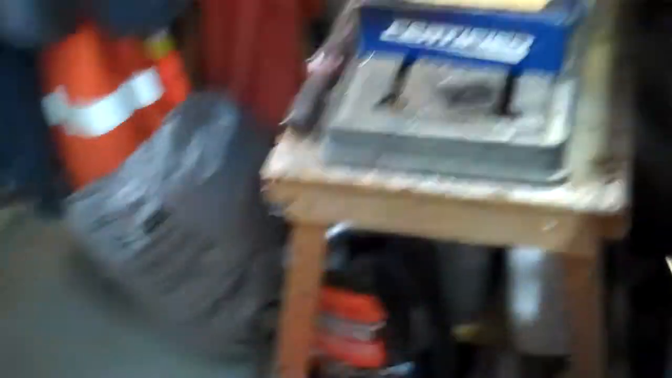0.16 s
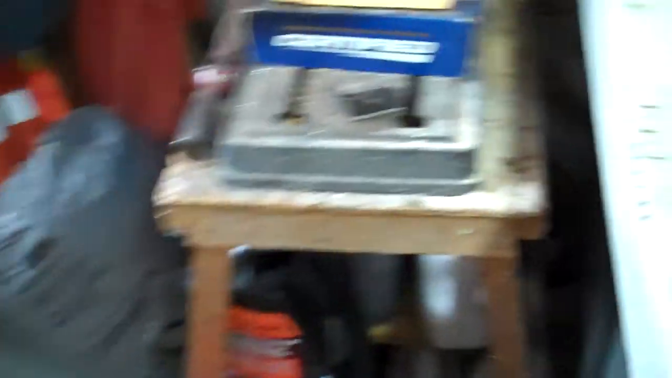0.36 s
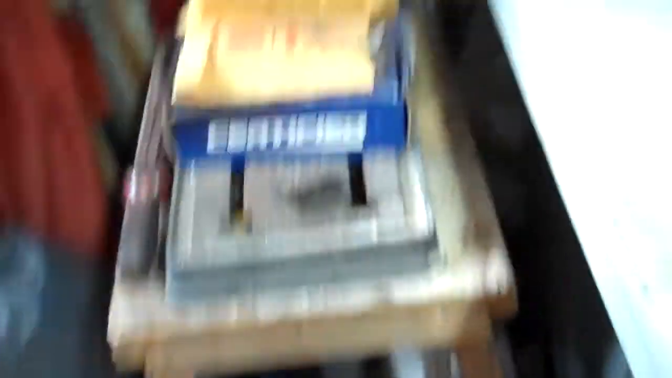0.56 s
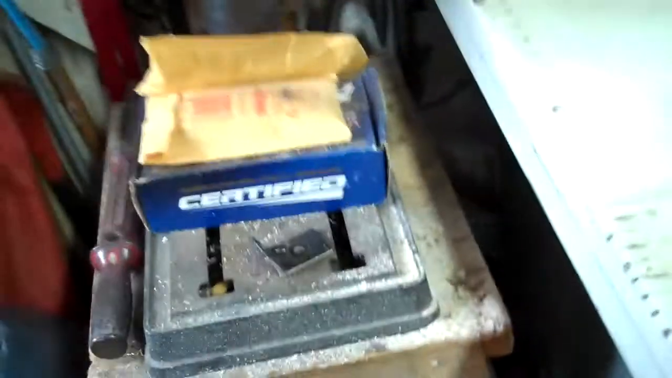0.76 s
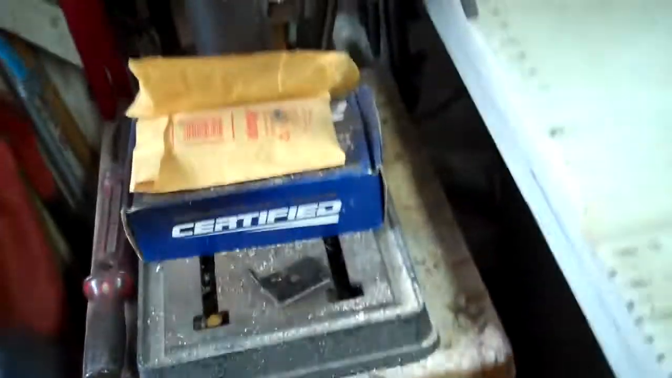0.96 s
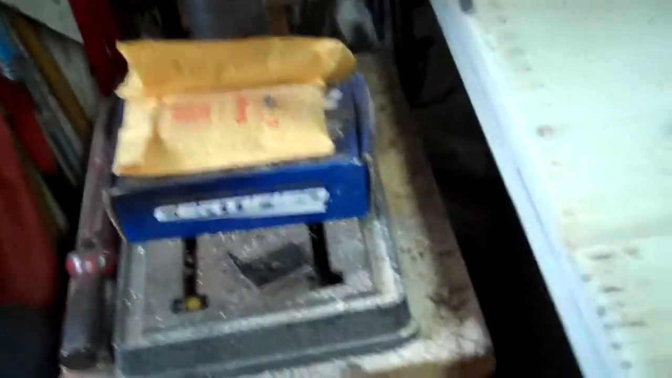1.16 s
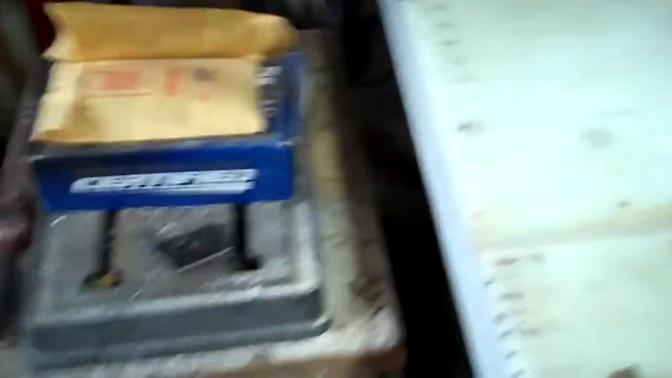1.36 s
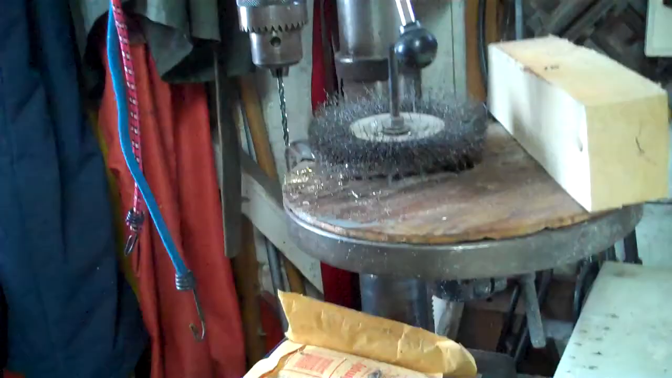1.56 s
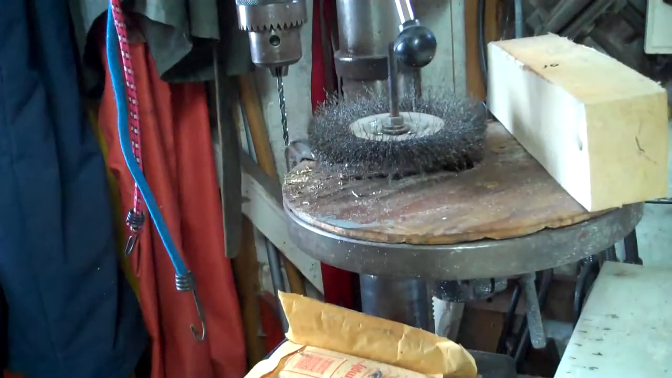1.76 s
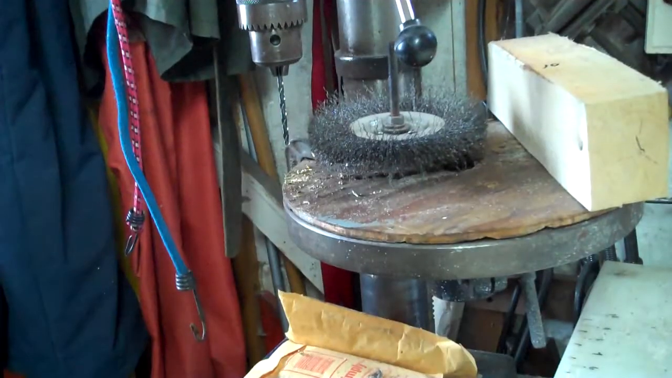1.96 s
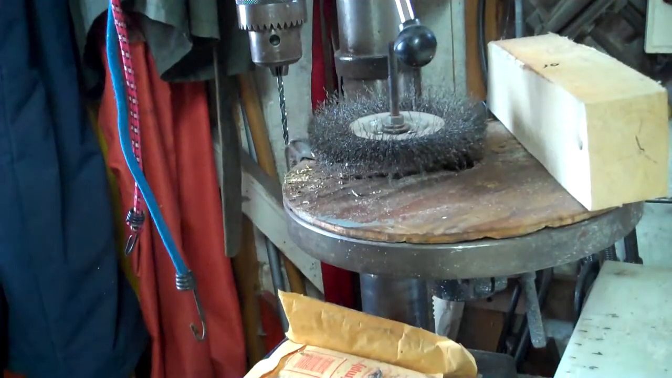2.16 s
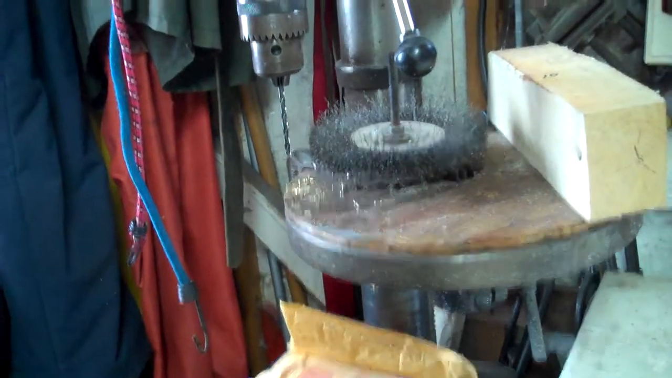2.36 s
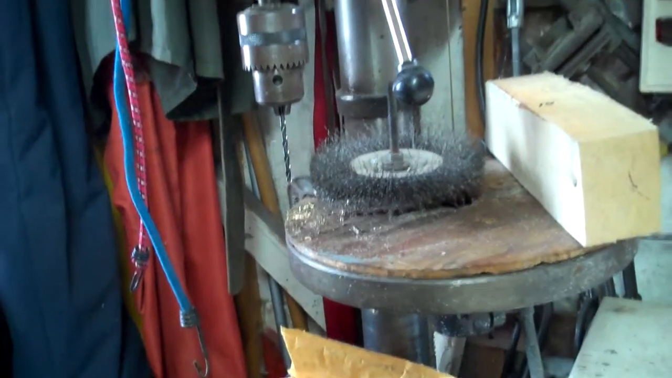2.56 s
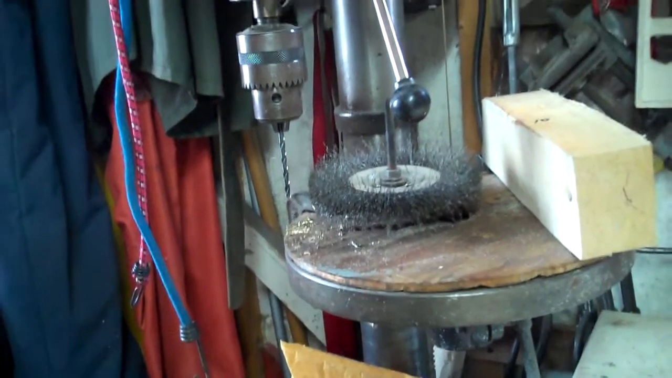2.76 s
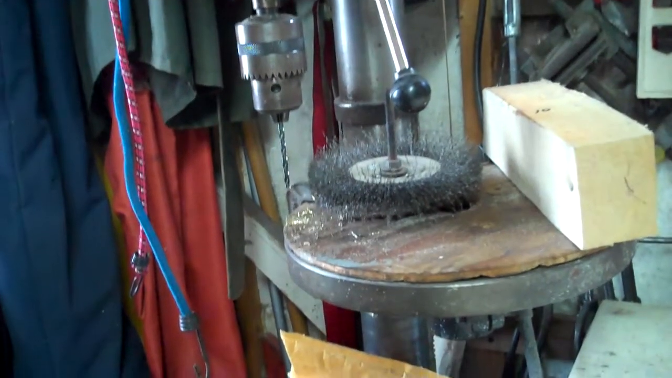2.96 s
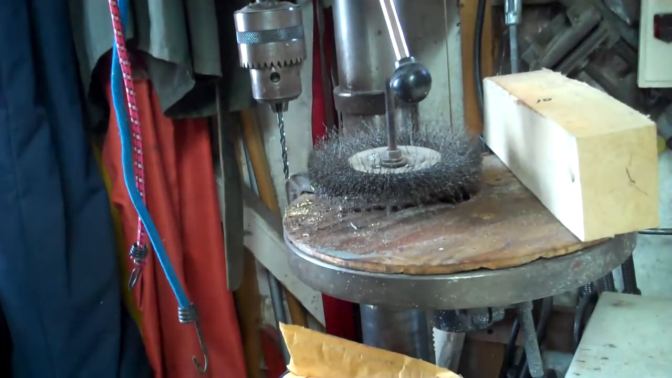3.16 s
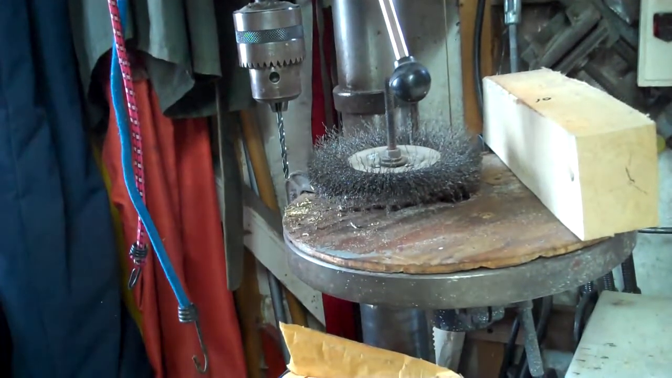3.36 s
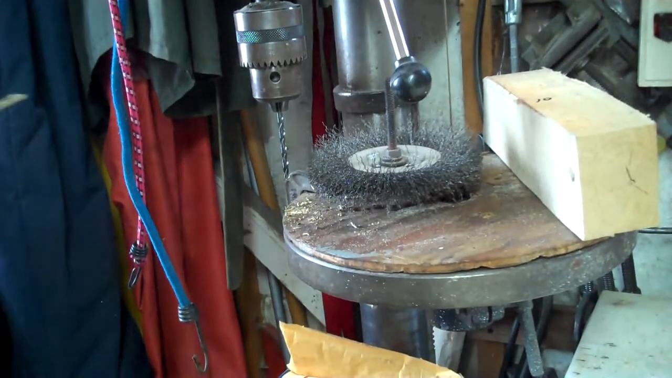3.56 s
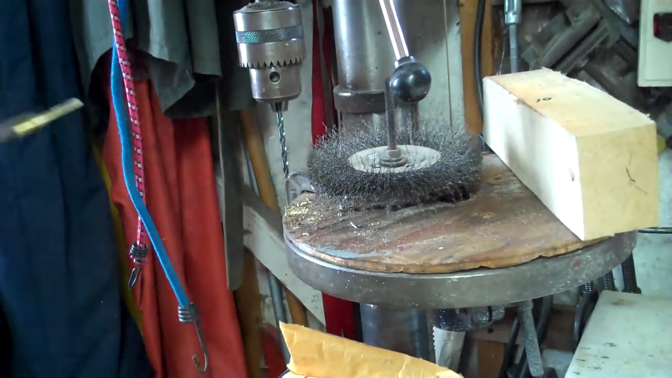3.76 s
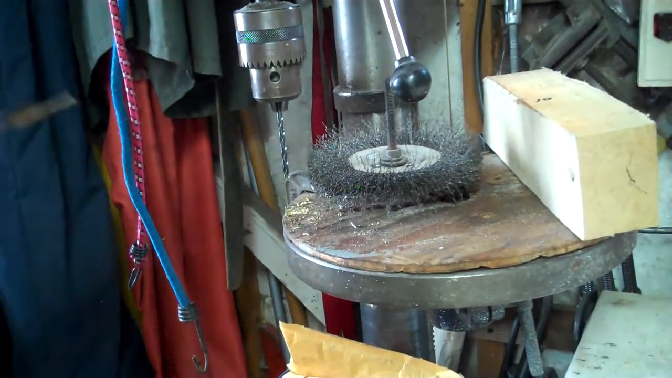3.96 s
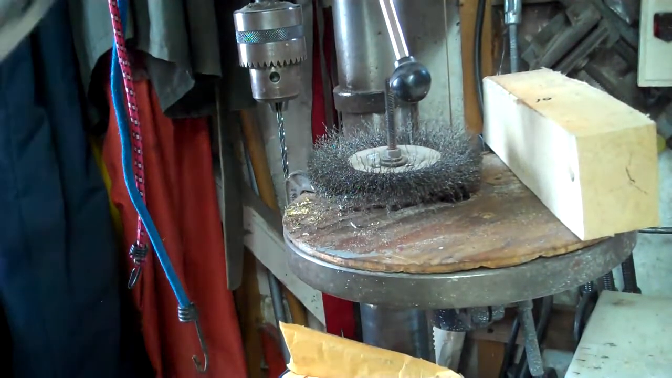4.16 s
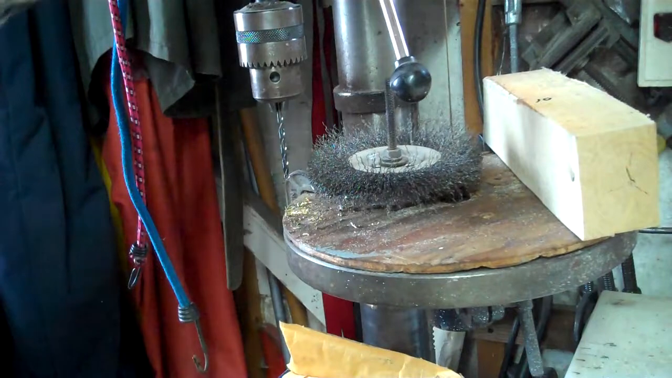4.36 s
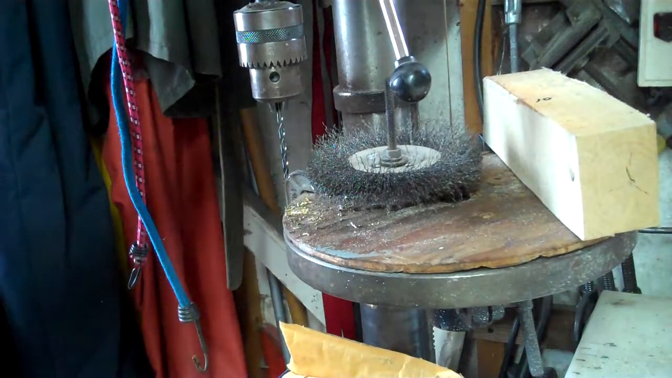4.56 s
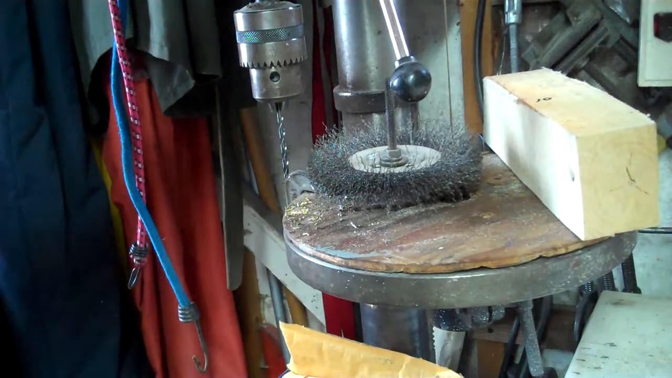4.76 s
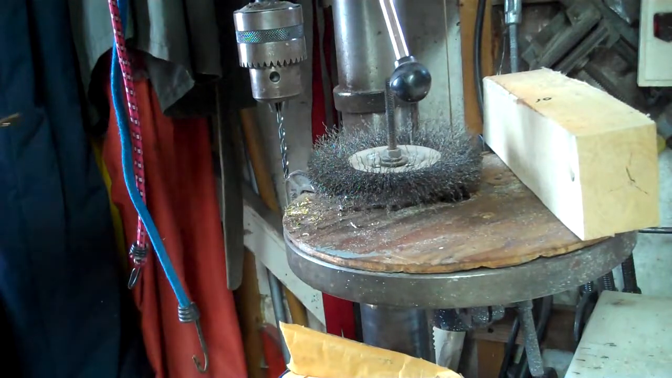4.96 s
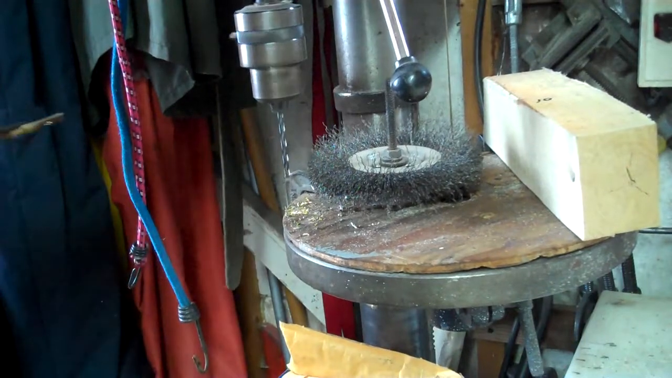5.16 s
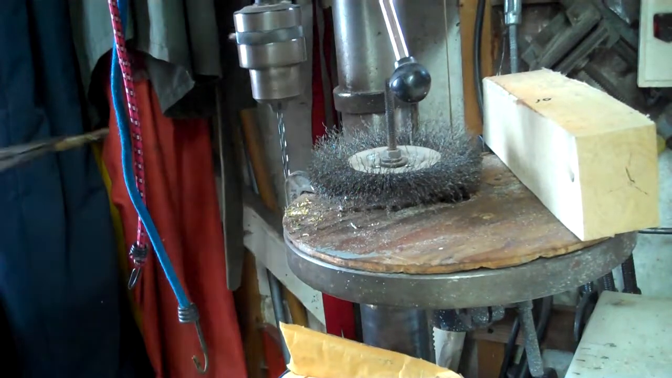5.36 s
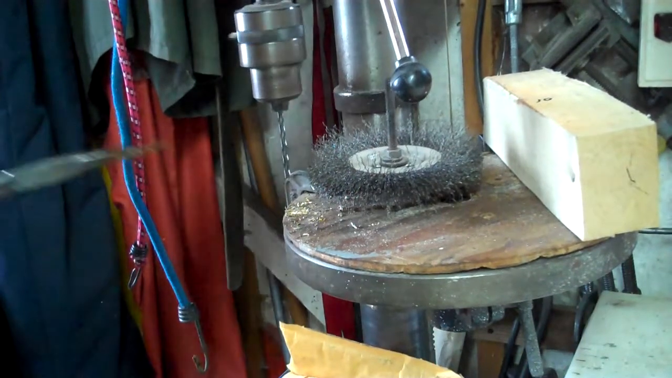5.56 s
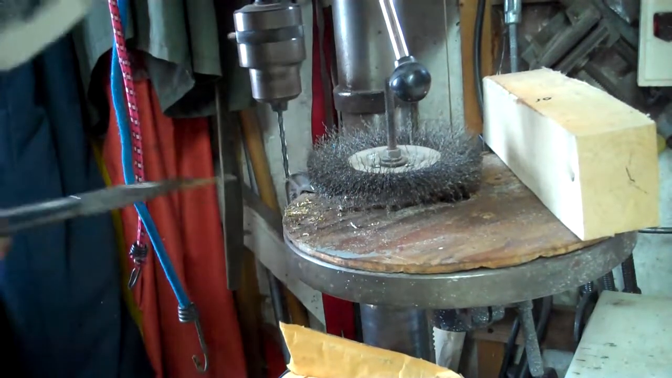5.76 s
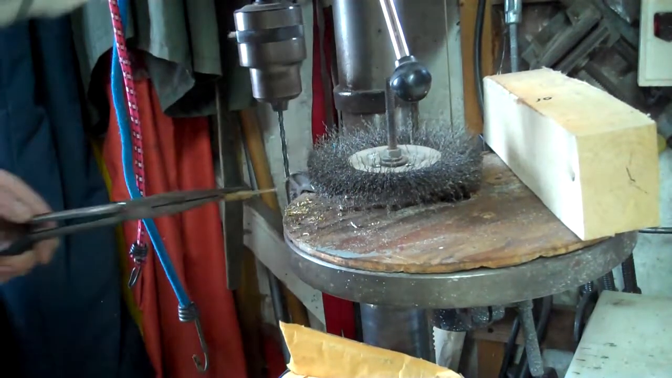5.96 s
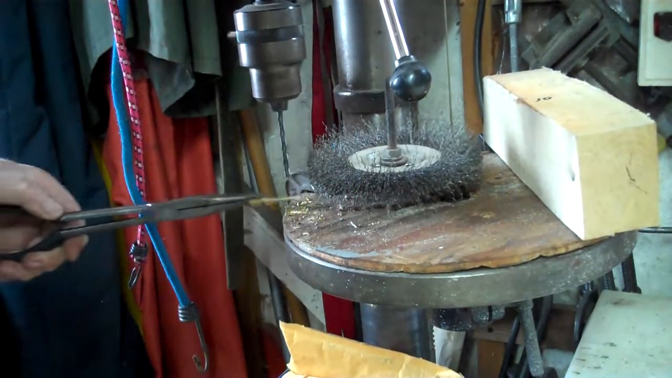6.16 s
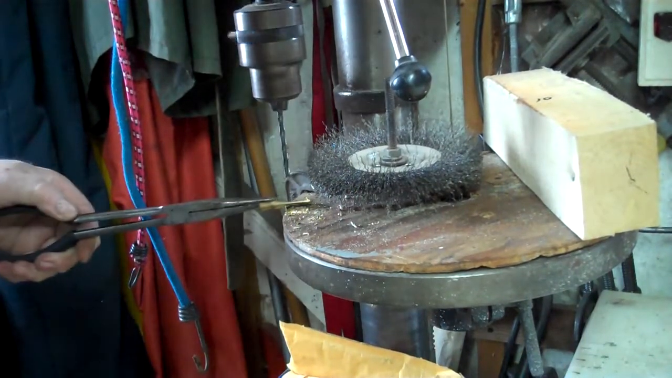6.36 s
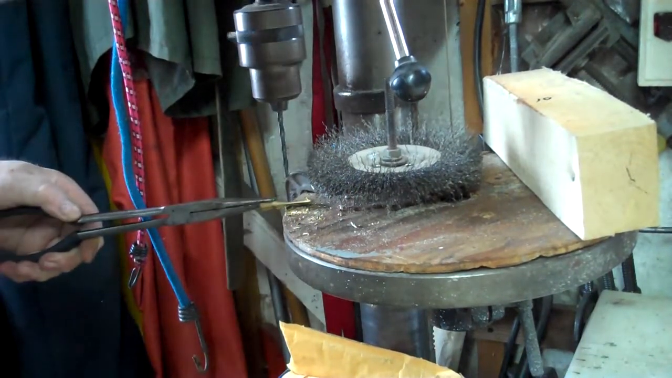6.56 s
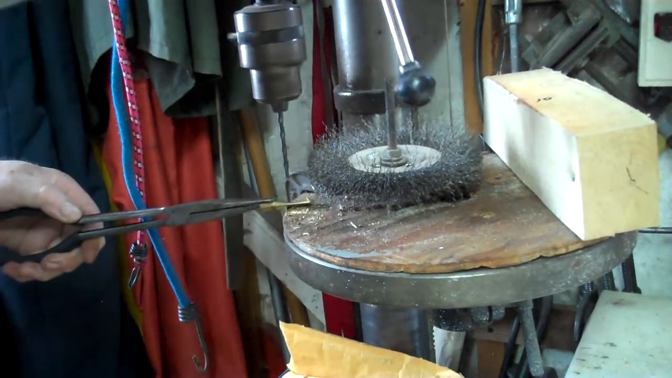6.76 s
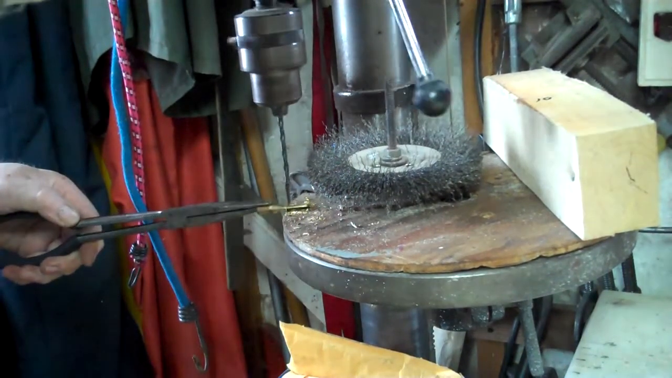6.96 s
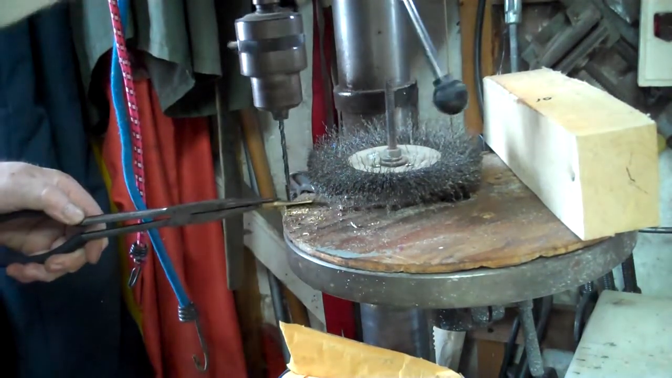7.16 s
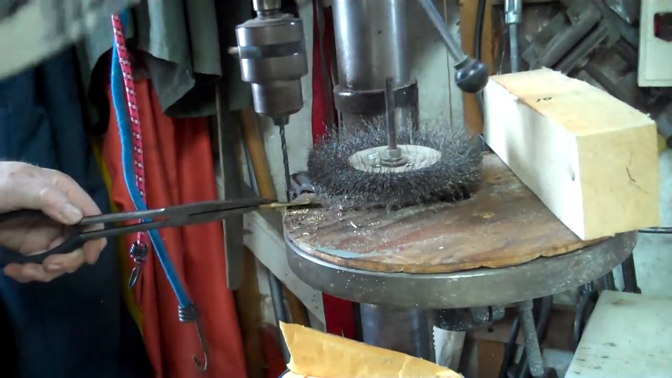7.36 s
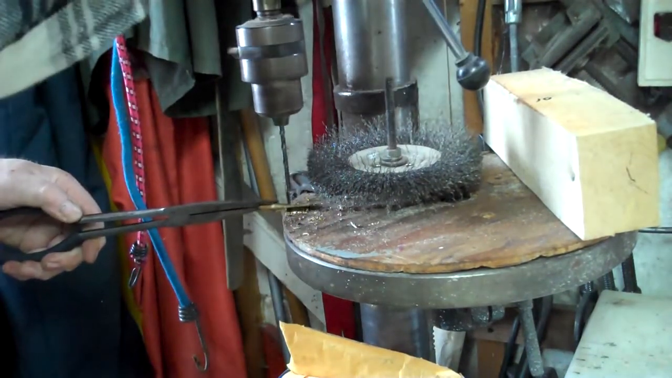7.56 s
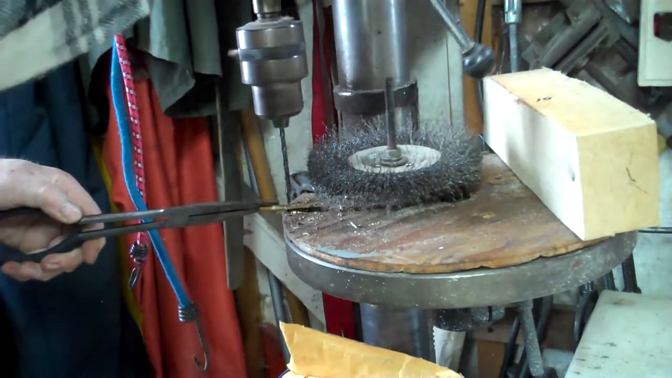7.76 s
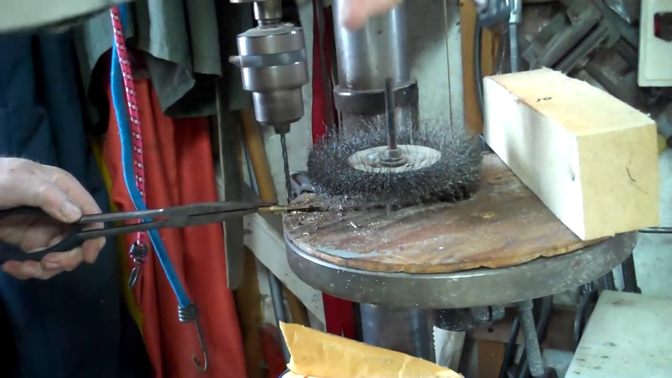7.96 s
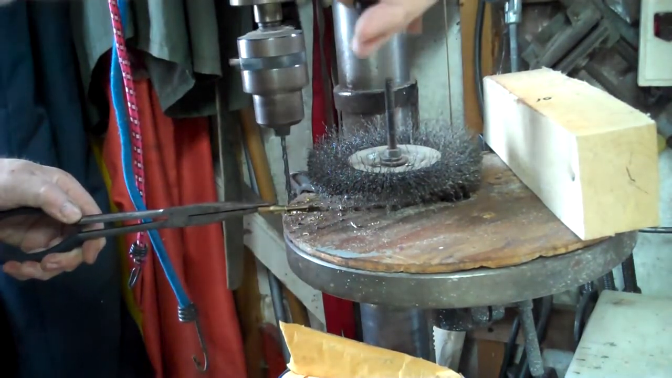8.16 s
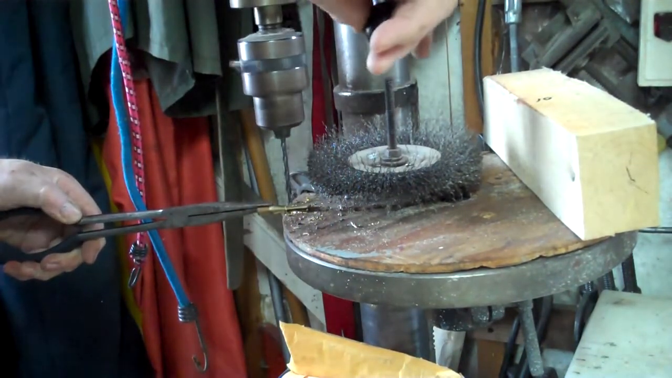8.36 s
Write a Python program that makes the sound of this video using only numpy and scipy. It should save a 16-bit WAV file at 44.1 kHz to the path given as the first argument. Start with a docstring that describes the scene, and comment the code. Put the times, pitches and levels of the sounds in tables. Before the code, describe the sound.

Metal parts knock and slide on a bench, a brief dropout pops, then a bench drill starts, ticking steadily before its bit rasps and squeals.

```python
"""In a small workshop, metal pieces are handled with clicks, knocks and scuffs: decaying modes and noise.
A switch snaps and a bench drill press runs: mains harmonics hum, noise bands whir and hiss.
It rubs once a turn, about five times a second; fed into a brass case held in pliers, the bit rasps:
short swells of resonant noise, joined by a squeal that grows as the cut goes on.
Diffuse echoes and still air surround it; early on the sound drops out briefly and returns with a pop."""
import sys
import numpy as np
from scipy import signal
from scipy.fft import rfft, irfft, next_fast_len
from scipy.io import wavfile

SR = 44100
rng = np.random.default_rng(int(sys.argv[2]) if len(sys.argv) > 2 else 0)


def file_out(sig):
    """Save sig as 16-bit WAV at sys.argv[1]."""
    # one column per channel
    cols = np.atleast_2d(sig).T
    # limit, then scale
    lim = np.clip(cols, -1, 1)
    pcm = np.round(lim * 32767).astype(np.int16)
    wavfile.write(sys.argv[1], SR, pcm)


N = 370881
T = np.arange(N) / SR
SIZE = next_fast_len(N + SR, real=True)
BINS = np.maximum(np.arange(SIZE // 2 + 1) * SR / SIZE, 1)  # frequencies of the spectrum [Hz]
DROPOUT_S, POP_S, POP_END_S = 1.57, 1.598, 1.6115
FIRST_RUB_S, TURN_S = 5.272, 0.1985  # one rub is heard per turn


def from_db(db):
    """Level definition: decibels to amplitude gain."""
    return 10 ** (np.asarray(db) / 20)


def rms_one(x):
    """Normalization: the centre of the stereo image gets rms 1."""
    centre = np.atleast_2d(x).mean(axis=0)
    return x / np.sqrt(np.mean(centre ** 2) + 1e-20)


def at_hz(points, hz, axis=1):
    """Interpolation of one table column on a logarithmic frequency axis."""
    rows = np.array(points)
    return np.interp(np.log(hz), np.log(rows[:, 0]), rows[:, axis])


def gains(rows):
    """Level history: each dB column becomes a gain in time."""
    s, *columns = np.transpose(rows)
    return [from_db(np.interp(T, s, column)) for column in columns]


def drift(rate):
    """Random fluctuation of rms 1: chance values, `rate` per second, joined by straight lines."""
    points = rng.standard_normal(16384)
    return rms_one(np.interp(T * rate, np.arange(len(points)), points))


def band(low_hz, high_hz):
    """Band-pass filtering: gain per frequency with steep flanks."""
    return 1 / np.sqrt((1 + (low_hz / BINS) ** 10) * (1 + (BINS / high_hz) ** 10))


def colour(spectrum):
    """Spectral density: gain per frequency of a spectrum table."""
    return from_db(at_hz(spectrum, BINS))


def resonances(modes):
    """Resonance: steep-sided peaks in the gain, each carrying the power of its dB."""
    power = 0
    for hz, width_hz, db in modes:
        shape = 1 / (1 + ((BINS - hz) / width_hz) ** 2) ** 2
        power = power + from_db(db) ** 2 * shape / shape.mean()
    return np.sqrt(power)


def crowd_of_modes(uneven_db=2.5, spacing_hz=90):
    """Modal density: small metal parts have many modes, some strong and some weak."""
    heights = rng.standard_normal(2048)
    return from_db(uneven_db * np.interp(BINS / spacing_hz, np.arange(len(heights)), heights))


def strikes(rows, rise_s):
    """Exponential decay: blows (time [s], level [dB], T60 [s]) rise quickly and fall evenly in dB."""
    envelope, t = np.zeros(N + SR), T[:SR * 3 // 4]
    for s, db, t60 in rows:
        start = int(s * SR)
        decay = np.exp(-np.log(1000) * t / t60)
        envelope[start:start + len(t)] += from_db(db) * (1 - np.exp(-t / rise_s)) * decay
    return envelope[:N]


# The two microphone ports: (frequency [Hz], likeness [0-1], left minus right [dB])
MICROPHONE_PORTS = [(62, 0.6, -1), (300, 0.92, -2.5), (1000, 0.92, -2.5), (2160, 0.79, -1.5),
                    (3700, 0.34, -1.5), (5060, 0.35, -6), (6400, 0.2, -3.5), (7000, 0, 16),
                    (9200, 0.3, 7.5), (13700, 0, 6.5)]


def noise(shape):
    """Interchannel coherence: coloured stereo noise, as alike at the two ports as the table says."""
    mid, side = rfft(rng.standard_normal((2, SIZE)))
    alike = np.clip(at_hz(MICROPHONE_PORTS, BINS), -.5, .999)
    side = side * np.sqrt((1 - alike) / (1 + alike))
    return irfft(shape * np.array([mid + side, mid - side]), SIZE)[:, :N]


# Spectrum of the still air of the shop: (frequency [Hz], density [dB per Hz])
AIR_SPECTRUM = [(15, -28), (25, -2), (49, -12.5), (108, -13.5), (296, -4), (711, -3), (812, -0.5),
                (880, -3.5), (978, -1), (1310, -4.5), (2230, -4.5), (2410, -9.5), (3320, -9.5), (8420, -13),
                (14300, -21.5)]


def still_air(level_db=-58):
    """Stationary noise: the air of the shop is a steady, coloured background."""
    return from_db(level_db) * rms_one(noise(colour(AIR_SPECTRUM)))


# Strokes of things sliding under the hand; a common trim is added to each band:
# (time of peak [s], level before trim [dB], weight of low band [dB], rise [s], fall [s])
SLIDING_STROKES = [(0.245, -43.5, -11, 0.044, .06), (0.322, -45.5, 5, .02, .16),
                   (0.383, -34, -3, 0.086, 0.075), (0.435, -44.5, -2, 0.025, 0.1),
                   (0.69, -48, -5, 0.33, 0.72), (0.855, -41, 0.5, .1, 0.11), (1.3, -51, -1, 0.097, 0.22),
                   (1.45, -51, 1, 0.26, 0.29), (3.6, -56.5, 8, .03, 0.3), (3.86, -54, -3.5, 0.74, 0.63),
                   (4.0, -61, 10, .03, .2), (4.051, -46, 1, 0.078, 0.06)]
# Spectrum of the sliding surfaces: (frequency [Hz], density [dB per Hz])
SLIDE_SPECTRUM = [(120, -52), (200, -10), (393, -6), (591, 0), (1180, -3.5), (1440, 0.5), (1630, -6.5),
                  (4330, -17), (5650, -9), (14000, -40)]
STROKE_RANGE_DB = 20  # a stroke climbs this much in its rise and sinks as much in its fall


def sliding(low_db=-3.0, high_db=0.5, grain_db=2.0, grain_rate=260):
    """Stick-slip friction: strokes swell and fade; catching and slipping makes the scuff grainy."""
    surface = colour(SLIDE_SPECTRUM) * crowd_of_modes()
    low = from_db(low_db + grain_db * drift(grain_rate)) * rms_one(noise(surface * band(190, 1700)))
    high = from_db(high_db + grain_db * drift(grain_rate)) * rms_one(noise(surface * band(2000, 9100)))
    low_gain, high_gain = 0, 0
    for s, db, weight_db, rise_s, fall_s in SLIDING_STROKES:
        away = np.minimum(np.maximum((s - T) / rise_s, (T - s) / fall_s), 10)
        stroke = from_db(db - STROKE_RANGE_DB * away)
        low_gain = np.maximum(low_gain, stroke * from_db(weight_db))
        high_gain = np.maximum(high_gain, stroke)
    return low_gain * low + high_gain * high


# A heavy piece lands, then each further contact is softer, lighter and sharper
CLUNK_S, CLUNK_DB, CLUNK_WEIGHT_DB, CLUNK_EDGE_DB, CLUNK_T60_S = 0.941, -14, 14, 1.5, 0.046
BOUNCE_S, BOUNCE_LOSS_DB, BOUNCE_LIGHTER_DB, BOUNCE_SHARPER_DB = 0.007, 2, 11.5, 2


def bounces(count=3):
    """Energy loss at impact: the successive contacts of the heavy piece, as rows of knocks."""
    return [(CLUNK_S + k * BOUNCE_S,
             CLUNK_DB - k * BOUNCE_LOSS_DB,
             CLUNK_WEIGHT_DB - k * BOUNCE_LIGHTER_DB,
             CLUNK_EDGE_DB + k * BOUNCE_SHARPER_DB,
             CLUNK_T60_S) for k in range(count)]


# Metal pieces clicking and knocking; a common trim is added, and each band scales the decay:
# (time [s], level before trim [dB], weight [dB], edge [dB], base T60 [s])
METAL_KNOCKS = [(0.22, -35.5, 7.5, -25, 0.13), (0.275, -35.5, 2, -25, 0.046), (0.42, -40, 13, -24, 0.072),
                (0.763, -19.5, -1.5, -3, 0.051), (0.892, -39, 20, 6, 0.097), (0.927, -31, -2, 0, 0.07),
                (1.2077, -40, 13, -8, 0.023), (3.624, -55, 12, 2, 0.068), (3.788, -43.5, -1, -20, .09),
                (4.063, -12, -2, 3.5, 0.073), (4.101, -18.5, 6.5, -6, .16), (4.218, -35.5, -1, -1, 0.14),
                (4.434, -25, 1.5, -8.5, 0.14), (4.529, -31, -1.5, -7, 0.11), (4.675, -36.5, -4, -12, 0.067),
                (4.735, -38.5, -1.5, -18, 0.12), (4.857, -29.5, -1.5, -12, 0.07),
                (4.927, -33, -4, -25, 0.075), (4.954, -34, -8, -5, 0.058), (4.983, -7, -13.5, -9, 0.075),
                (5.05, -8.5, 1, -4, 0.078), (5.278, -28, 9, -22, 0.16), (5.369, -19, -7, -3.5, 0.061),
                (5.859, -34, 16, -18, .1), (5.885, -41, 11, -18, 0.089), (6.879, -27, -4, 2, 0.041)]
# Borders of the four bands thud, body, ring, edge: (frequency [Hz])
KNOCK_BORDERS = [200, 700, 2500, 9000, 15000]
# Spectrum of a metal contact: (frequency [Hz], density [dB per Hz])
CONTACT_SPECTRUM = [(120, -32.5), (320, -13), (560, -15.5), (980, -8.5), (1400, -2.5), (2200, -7.5),
                    (2700, -5.5), (4200, -5.5), (5300, 0.5), (6500, -4), (7700, -5.5), (9800, -26),
                    (14300, -33.5)]
THUD_DB, BODY_DB = -22.5, -9  # against the ring, at weight 0
THUD_PER_WEIGHT, BODY_PER_WEIGHT = 1.455, 0.87  # dB per dB of weight


def knocks(level_db=-0.5, rise_s=0.0017, thud_length=1.82, body_length=1.27, edge_length=0.78,
           chatter_db=2.0, chatter_rate=450):
    """Modal excitation: a contact chatters and wakes many short-lived modes; the low ones last longest."""
    s, db, weight_db, edge_db, t60 = np.transpose(METAL_KNOCKS + bounces())
    parts = [(THUD_DB + THUD_PER_WEIGHT * weight_db, thud_length),
             (BODY_DB + BODY_PER_WEIGHT * weight_db, body_length),
             (0, 1),
             (edge_db, edge_length)]
    metal = colour(CONTACT_SPECTRUM) * crowd_of_modes()
    out = 0
    for k, (rel_db, length) in enumerate(parts):
        envelope = strikes(zip(s, db + rel_db, t60 * length), rise_s)
        out = out + envelope * rms_one(noise(metal * band(*KNOCK_BORDERS[k:k + 2])))
    return from_db(level_db + chatter_db * drift(chatter_rate)) * out


def radiated(x, lowest_hz=130):
    """Radiation efficiency: small parts radiate almost no bass."""
    return signal.sosfilt(signal.butter(2, lowest_hz, "high", fs=SR, output="sos"), x + 1e-18)


def from_the_right(x, lag_s=.00008):
    """Time difference of arrival: the first things handled lie to the right and reach the left later."""
    lag = round(lag_s * SR) / SR * (T < DROPOUT_S)
    return np.array([np.interp(T - lag, T, x[0]), x[1]])


# Decay of the room: (frequency [Hz], T60 [s])
ROOM_DECAY = [(200, 0.83), (500, 0.52), (1500, 0.37), (5000, 0.29), (12000, 0.2)]


def room(x, low_db=-3.0, high_db=-8.0, build_s=0.0049):
    """Reverberation: diffuse echoes of a cluttered shop; the treble dies first."""
    t, edges = T[:SR * 3 // 4], np.geomspace(100, 16000, 9)
    white, response = noise(0.83)[:, :len(t)], 0
    for low, high in zip(edges, edges[1:]):
        hz = np.sqrt(low * high)
        fall = (1 - np.exp(-t / build_s)) * np.exp(-np.log(1000) * t / at_hz(ROOM_DECAY, hz))
        echoes = signal.sosfilt(signal.butter(2, [low, high], "band", fs=SR, output="sos"), white)
        gain = from_db(at_hz([(500, low_db), (6000, high_db)], hz))
        response = response + echoes * fall / np.linalg.norm(fall) * gain
    return signal.fftconvolve(x, response, axes=1)[:, :N]


# Blows that ring, each on a different part; a common trim is added to the levels:
# (time [s], modes as (frequency [Hz], level before trim [dB], T60 [s]))
RINGING_BLOWS = [ (0.765, [(1956, -25.5, .055), (2230, -23, 0.058), (7200, -38, 0.049)]),
                 (0.943, [(200.6, -35.5, 0.24), (351, -29, 0.33), (504, -24.5, 0.18), (700, -28, 0.24),
                 (1050, -21, 0.075), (1264, -26, 0.1), (5740, -32, 0.099), (6900, -26.5, 0.081),
                 (7840, -14.5, 0.12), (9070, -19.5, 0.14), (11500, -23, 0.056)]),
                 (3.626, [(855, -42, 0.054), (1447, -43, 0.041)]), (4.066, [(4710, -14, 0.042),
                 (5490, -4, 0.035), (7800, -23, 0.039), (9850, -18.5, 0.036)]), (4.103, [(354, -35, 0.28),
                 (877, -33, 0.12), (1405, -26.5, 0.29), (1558, -29.5, 0.25), (1717, -27.5, 0.24),
                 (5660, -20, 0.096)]), (4.985, [(300, -34.5, 0.29), (2130, -18.5, 0.084), (2215, -22, 0.12),
                 (5130, -16, .07), (5770, -15, 0.05)]), (5.053, [(312, -32, 0.32), (976, -17, 0.052),
                 (1130, -24, 0.1), (3100, -15.5, 0.06), (3790, -15.5, 0.053), (5324, -5.5, 0.032)]),
                 (5.863, [(535, -33, 0.1), (678, -29.5, 0.13), (1735, -29, .1)])]


def clanks(level_db=2.5, rise_s=0.00037, rattle=0.63, rattle_rate=140, blur_hz=6000, port_phase=0.84):
    """Free vibration: struck parts ring and rattle against their supports; high modes blur most."""
    out, t = np.zeros((2, N)), T[:SR // 2]
    for s, modes in RINGING_BLOWS:
        start = int(s * SR)
        for hz, db, t60 in modes:
            blur = 1 + (hz / blur_hz) ** 2
            wobble = (drift(rattle_rate * blur) + 1j * drift(rattle_rate * blur))[:len(t)]
            shake = 1 / np.sqrt(blur) + rattle * wobble
            # the less alike the ports, the further apart their phases [rad]
            lag = port_phase * (1 - at_hz(MICROPHONE_PORTS, hz)) * np.array([[.5], [-.5]])
            tone = np.imag(shake * np.exp(1j * (2 * np.pi * hz * t + lag)))
            envelope = (1 - np.exp(-t / rise_s)) * np.exp(-np.log(1000) * t / t60)
            out[:, start:start + len(t)] += from_db(level_db + db) * envelope * tone
    return out


# Dull thumps into wooden furniture, stool or bench: (time [s], level [dB], T60 [s])
FURNITURE_THUMPS = [(0.945, -35.5, 0.69), (1.18, -51, 0.72), (2.185, -54, 0.22), (3.584, -41.5, 0.063),
                    (3.673, -36.5, 0.11)]
# Resonances of the furniture: (frequency [Hz], width [Hz], level [dB])
FURNITURE_MODES = [(190, 23, -17.5), (393, 56, -4.5), (556, 77, -3.5), (764, 120, -4.5), (1070, 170, -8.5),
                   (1450, 200, -14)]


def shudder(rise_s=0.0023):
    """Structure-borne sound: the wooden furniture shudders dully after each thump."""
    return strikes(FURNITURE_THUMPS, rise_s) * noise(resonances(FURNITURE_MODES))


# Light, dry ticks of small parts: (time [s], level [dB], T60 [s])
SMALL_TICKS = [(1.411, -34, 0.019), (2.1384, -28.5, 0.014), (2.1695, -36, .022), (2.1826, -33.5, 0.025),
               (2.198, -45, .02), (2.2295, -47, .015), (3.206, -44, 0.025), (4.255, -39, 0.034),
               (4.817, -48, .03)]
# Resonances of the small parts: (frequency [Hz], width [Hz], level [dB])
SMALL_PART_MODES = [(1920, 1100, -7), (3760, 470, -4), (4500, 460, -7), (5500, 700, -5), (7460, 2200, -15)]


def ticks(rise_s=0.0005):
    """Strong damping: a tiny contact dies within a few hundredths of a second."""
    return strikes(SMALL_TICKS, rise_s) * noise(resonances(SMALL_PART_MODES))


def pop(height_db=-20.0, sag_s=0.014):
    """Step transient: a short pop, opposite in the two channels, sagging back to zero."""
    step = 1.0 * ((T >= POP_S) & (T < POP_END_S))
    after = np.maximum(T - POP_S, 0)
    undershoot = .15 * (T >= POP_END_S) * np.exp(-after / 0.1)
    shape = step * np.exp(-after / sag_s) - undershoot
    return from_db(height_db) * shape * np.array([[-1.1], [.9]])


# Dull bumps carried through the bench: (time [s], peak level [dB])
BENCH_BUMPS = [(4.0655, -22), (4.0684, -30), (4.988, -36), (5.052, -43)]


def bumps(contact_s=0.0004):
    """Impulsive force: one smooth, one-sided pulse for each bump."""
    return sum(from_db(db) * np.exp(-((T - s) / contact_s) ** 2) for s, db in BENCH_BUMPS)


MAINS_HZ = 60
# Motor hum: (multiple of the mains [-], rms level [dB])
HUM_HARMONICS = [(2, -55.5), (6, -46.5), (8, -59)]
# Thin bearing whines: (frequency [Hz], rms level [dB])
BEARING_WHINES = [(5714, -52.5), (5834, -55), (7143, -54.5), (7263, -56), (8571, -60), (8690, -57.5)]


def motor(flutter=0.05, wander_hz=1.8):
    """Magnetic forces: the stator hums on even multiples of the mains; bearings add wavering whines."""
    hum, whine = 0, 0
    for k, db in HUM_HARMONICS:
        hum = hum + from_db(db) * np.sin(2 * np.pi * (round(k) * MAINS_HZ * T + rng.random()))
    wander = wander_hz * np.cumsum(drift(6.7)) / SR  # shared by all whines [cycles]
    for hz, db in BEARING_WHINES:
        whine = whine + from_db(db) * np.sin(2 * np.pi * (hz * T + wander)) * (1 + flutter * drift(23))
    return np.sqrt(2) * (hum + whine) * np.ones((2, 1))


# The running press, before its fluctuations: (time [s], whir level [dB], bearing hiss level [dB])
RUNNING_LEVELS = [(5.0, -32.5, -51), (5.2, -37, -37), (5.6, -37, -38.5), (6.4, -37.5, -39),
                  (7.1, -37, -39.5), (8.41, -37, -39.5)]
# Spectrum of the whirring belt: (frequency [Hz], density [dB per Hz])
WHIR_SPECTRUM = [(41, -72), (70, -79), (109, -19.5), (146, -16), (210, -12), (316, -8), (354, -2),
                 (410, -6), (533, -8), (704, -7), (843, -3), (1250, -3.5), (3500, -13), (4550, -50),
                 (7700, -120)]
# Spectrum of the hissing bearings: (frequency [Hz], density [dB per Hz])
HISS_SPECTRUM = [(1180, -35), (2000, -35), (2340, -0.5), (2710, -10.5), (3620, -7), (4410, -5),
                 (4560, -3.5), (5330, -0.5), (6710, -5.5), (7410, 0.5), (8880, -14.5), (9250, -15.5),
                 (11000, -23), (12800, -22), (14300, -32)]
# Resonances of housing and belt guard, trimmed together: (frequency [Hz], width [Hz], level before trim [dB])
HOUSING_MODES = [(335, 42, -48.5), (705, 44, -46), (956, 11, -54), (1050, 18, -70), (1250, 82, -48.5),
                 (1390, 20, -62), (1495, 17, -49), (1710, 24, -58), (1846, 33, -48)]
# Resonances of the spindle bearings: (frequency [Hz], width [Hz], level [dB])
BEARING_MODES = [(4730, 110, -50), (5200, 100, -50), (5500, 57, -50.5), (6530, 42, -56)]


def drive(housing_db=-4.0, turn_hz=11.0, throb_db=0.42, rattle_db=1.0, grit_db=2.0, sway_db=1.13,
          flutter_db=3.5):
    """Amplitude modulation: the drive swells on every pulley turn; each housing panel flutters alone."""
    whir_gain, hiss_gain = gains(RUNNING_LEVELS)
    throb = throb_db * np.cos(2 * np.pi * turn_hz * (T - FIRST_RUB_S))
    turn_db = throb + sway_db * drift(30)
    belt = rms_one(noise(colour(WHIR_SPECTRUM) * band(90, 2730)))
    whir = from_db(rattle_db * drift(200)) * whir_gain * belt
    bearings = rms_one(noise(colour(HISS_SPECTRUM) * band(2820, 16000)))
    hiss = from_db(grit_db * drift(400)) * hiss_gain * bearings
    panels = sum(from_db(housing_db + flutter_db * drift(16)) * noise(resonances([mode]))
                 for mode in HOUSING_MODES)
    return from_db(turn_db) * (whir + hiss + panels + noise(resonances(BEARING_MODES)))


def press(switch_on_s=4.99, run_up_s=0.043):
    """Starting transient: motor and drive fade in linearly after the switch."""
    running = np.clip((T - switch_on_s) / run_up_s, 0, 1)
    return running * (motor() + drive())


def swell(from_peak_s, rise_s=0.013, fall_s=0.011):
    """Pulsed friction: one rub builds up and lets go, a little faster than it came."""
    away = np.maximum(-from_peak_s / rise_s, from_peak_s / fall_s)
    return np.exp(-away ** np.sqrt(2) / 2)


# How strongly the once-a-turn rub sounds: the turning spindle or belt at first,
# then the bit in the brass: (time [s], level [dB])
RUB_LEVELS = [(5.27, -33.5), (5.67, -33), (6.0, -44), (6.86, -34.5), (7.05, -22), (7.27, -22.5),
              (7.46, -25), (8.06, -23.5), (8.25, -29), (8.36, -34)]
# Resonances of quill and bit: (frequency [Hz], width [Hz], level [dB])
QUILL_MODES = [(867, 58, -13), (1190, 470, -11), (1610, 65, -9), (1870, 76, -14), (2550, 820, -16.5),
               (3434, 160, -16.5), (4390, 230, -18.5), (5250, 1300, -12.5)]
# The squeal as the cut goes on: (time [s], peak level against the rub [dB], mean frequency [Hz])
SQUEAL_COURSE = [(7.06, -13, 1090), (7.26, -6.5, 1104), (7.449, -2, 948), (7.561, 0.5, 1010),
                 (7.66, 0, 915), (7.8, -0.5, 1013), (8.41, 7, 982)]
SECOND_RUB_DB = -9.5  # half a turn later; in the cut, the second lip of the bit
TOUCH_S, TOUCH_DB = 6.769, -27.5  # the bit first meets the brass
SQUEAL_WIDTH_HZ = 38  # spread of the squeal's random pitch


def rasps(chatter_db=2.5, chatter_rate=350, uneven_db=4.0):
    """Forced vibration: rubs once a turn, with uneven ones between, chatter; in the brass a squeal grows."""
    turns = np.arange(FIRST_RUB_S, T[-1], TURN_S)
    second = from_db(SECOND_RUB_DB + uneven_db * drift(1 / TURN_S))
    pulses = sum(swell(T - s) + second * swell(T - s - TURN_S / 2) for s in turns)
    rub = gains(RUB_LEVELS)[0] * pulses + from_db(TOUCH_DB) * swell(T - TOUCH_S)
    chatter = from_db(chatter_db * drift(chatter_rate)) * noise(resonances(QUILL_MODES))
    s, rel_db, hz = np.transpose(SQUEAL_COURSE)
    pitch = np.interp(T, s, hz) + SQUEAL_WIDTH_HZ * drift(250)
    squeal = from_db(np.interp(T, s, rel_db)) * np.sin(2 * np.pi * np.cumsum(pitch) / SR)
    return rub * (chatter + squeal)


def scene():
    """Superposition: handling first, then the press, over the still air of the shop."""
    contacts = radiated(knocks() + clanks() + ticks() + rasps())
    handled = from_the_right(contacts + sliding() + shudder())
    return still_air() + handled + room(contacts) + bumps() + press()


def record(dry, cutoff_hz=14400):
    """Transduction: each port colours the sound; a dropout ends in a pop; peaks clip, the top is cut."""
    ports = from_db(at_hz(MICROPHONE_PORTS, BINS, axis=2) * np.array([[.5], [-.5]]))
    ports = ports / np.sqrt(np.mean(ports ** 2, axis=0))
    heard = irfft(rfft(dry, SIZE) * ports, SIZE)[:, :N]
    heard = heard * ((T < DROPOUT_S) | (T > POP_S)) + pop()
    top_cut = signal.ellip(10, .2, 70, cutoff_hz, fs=SR, output="sos")
    return signal.sosfilt(top_cut, np.clip(heard, -1, 1))


dry = scene()
out = record(dry)
file_out(out)
```